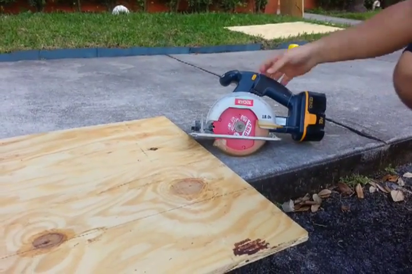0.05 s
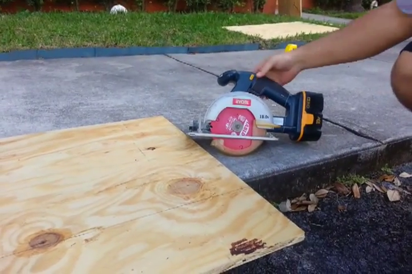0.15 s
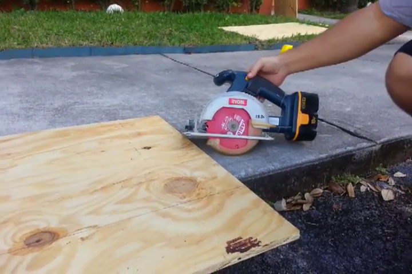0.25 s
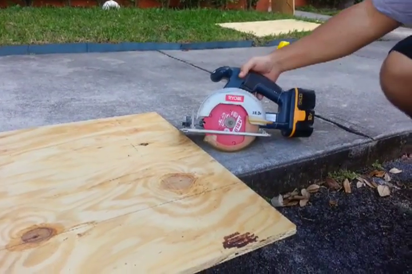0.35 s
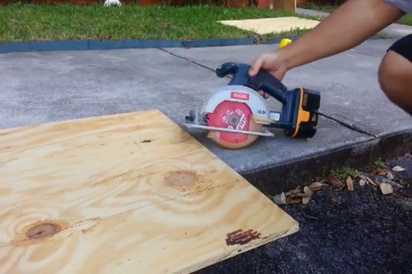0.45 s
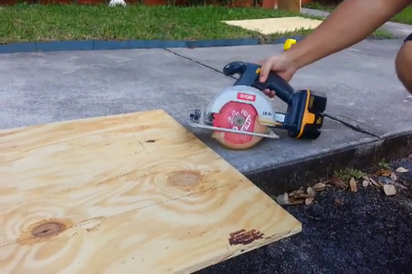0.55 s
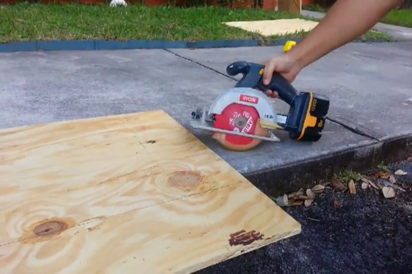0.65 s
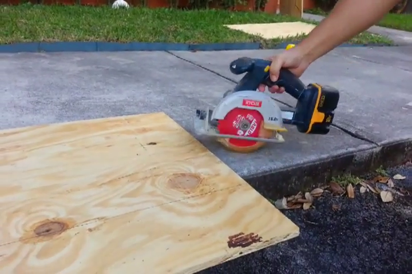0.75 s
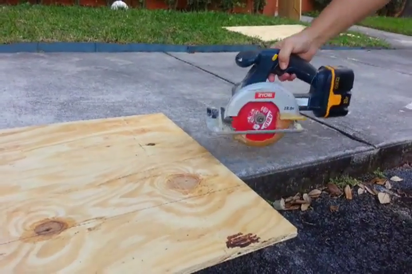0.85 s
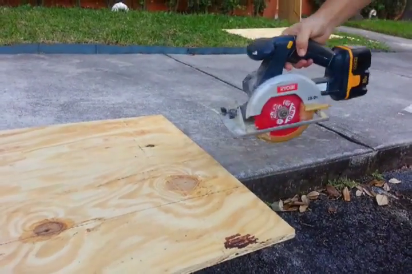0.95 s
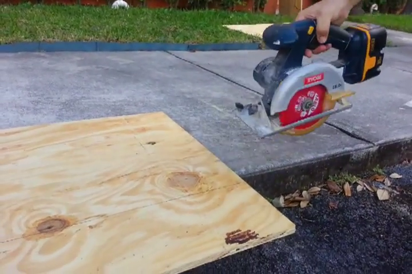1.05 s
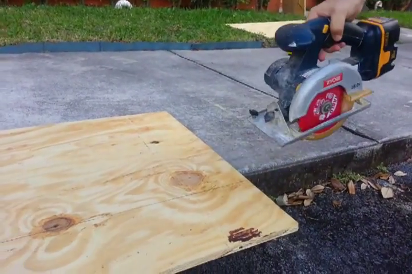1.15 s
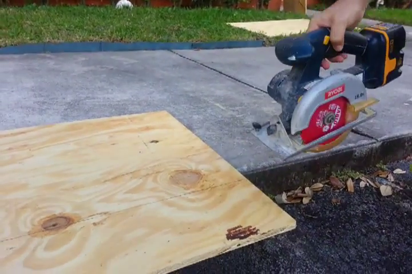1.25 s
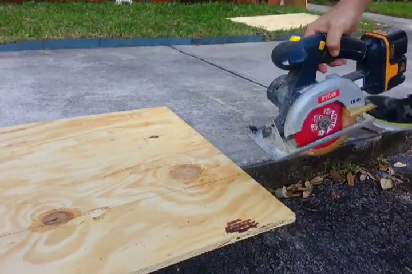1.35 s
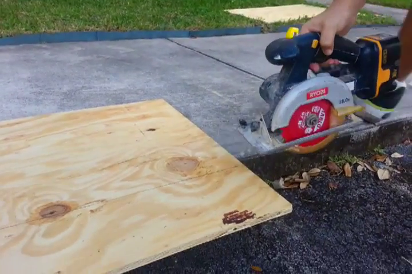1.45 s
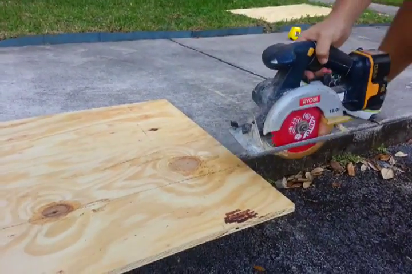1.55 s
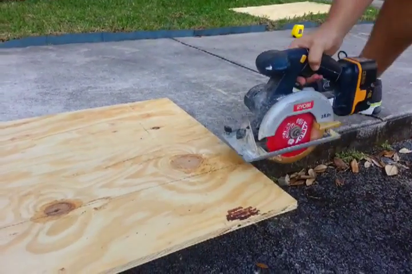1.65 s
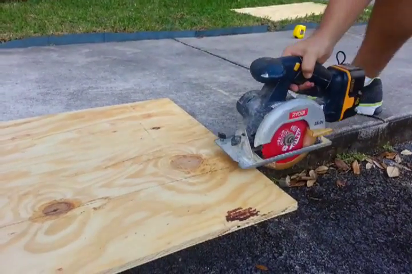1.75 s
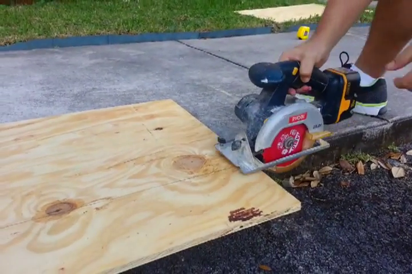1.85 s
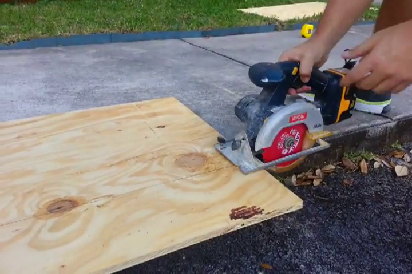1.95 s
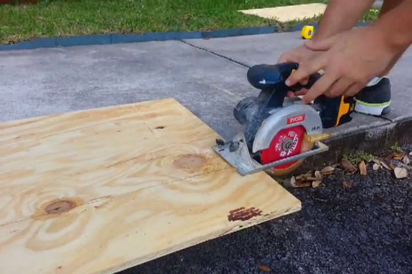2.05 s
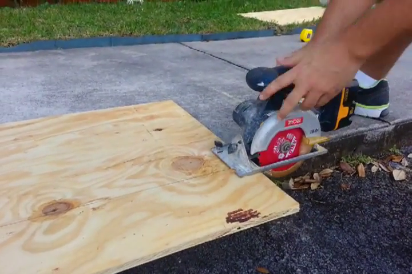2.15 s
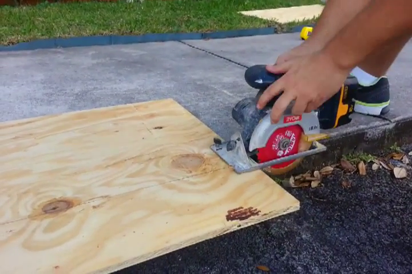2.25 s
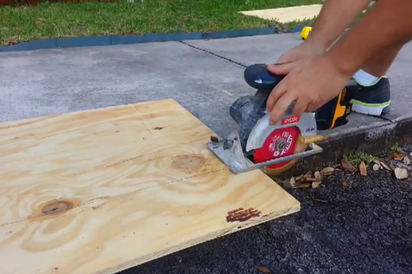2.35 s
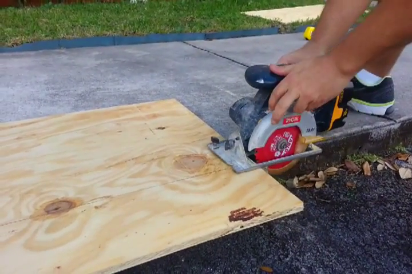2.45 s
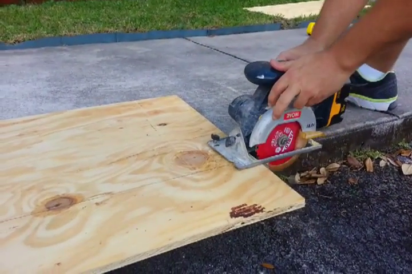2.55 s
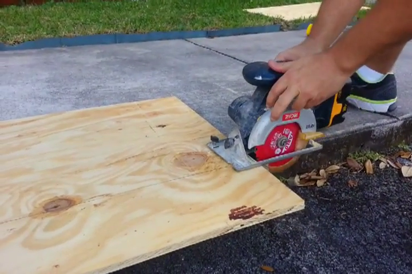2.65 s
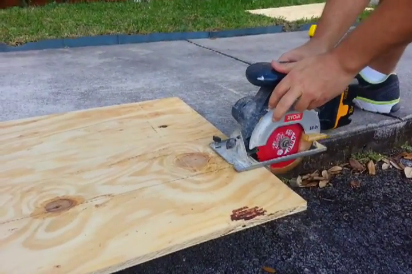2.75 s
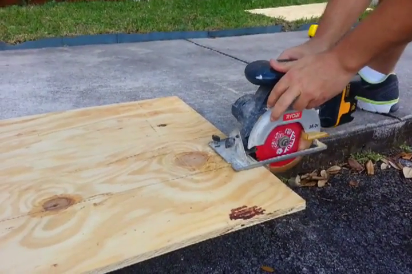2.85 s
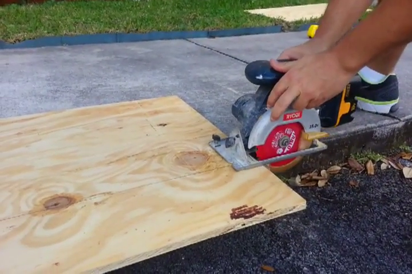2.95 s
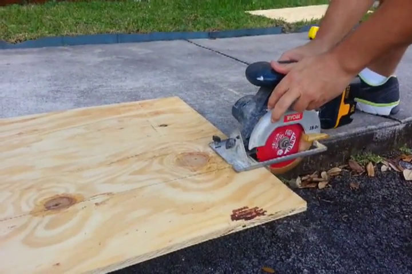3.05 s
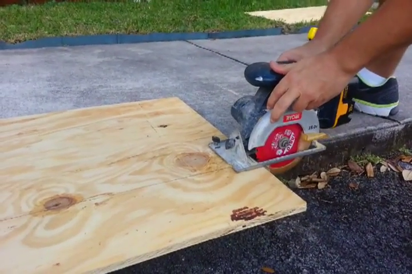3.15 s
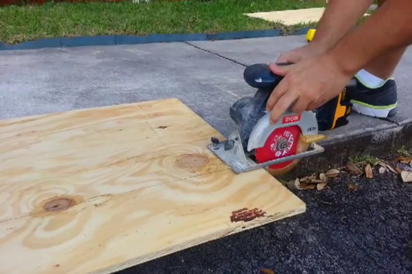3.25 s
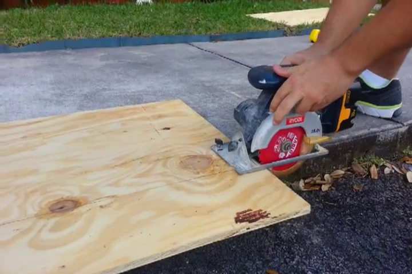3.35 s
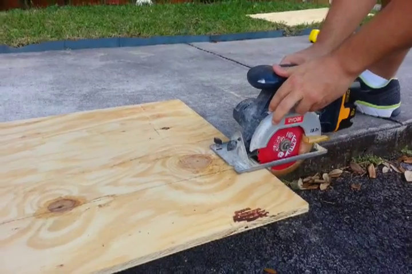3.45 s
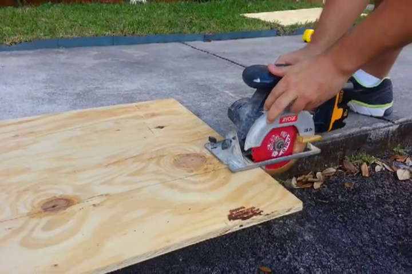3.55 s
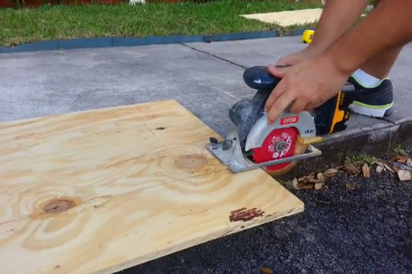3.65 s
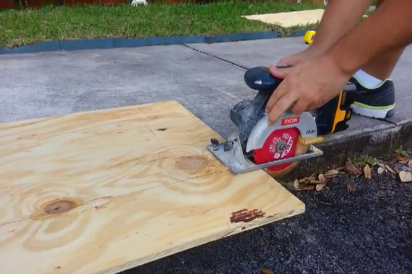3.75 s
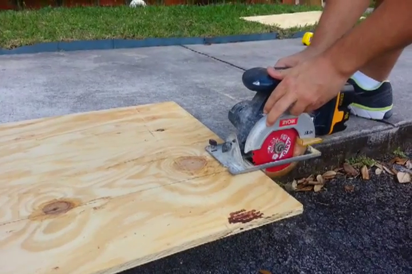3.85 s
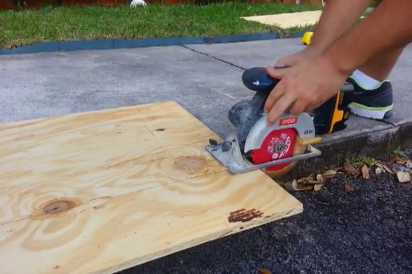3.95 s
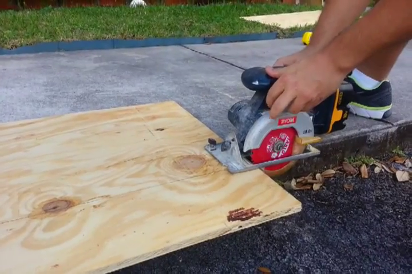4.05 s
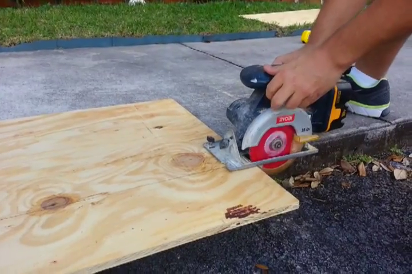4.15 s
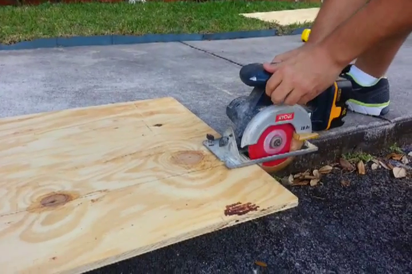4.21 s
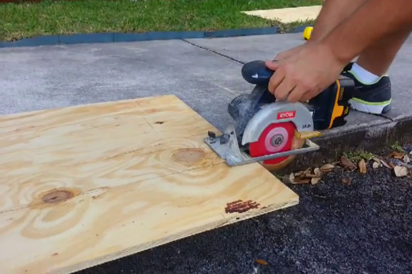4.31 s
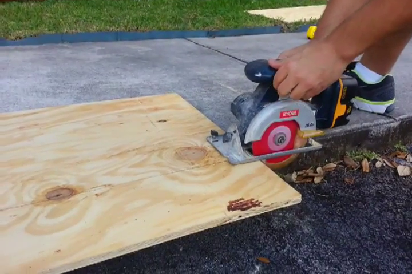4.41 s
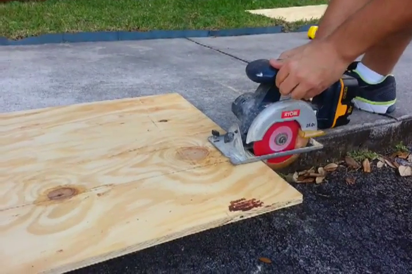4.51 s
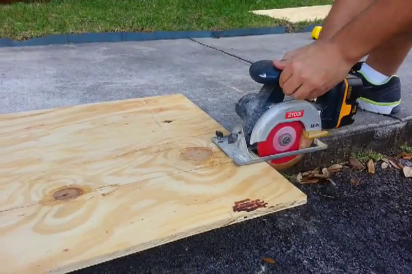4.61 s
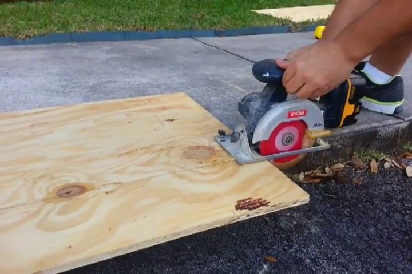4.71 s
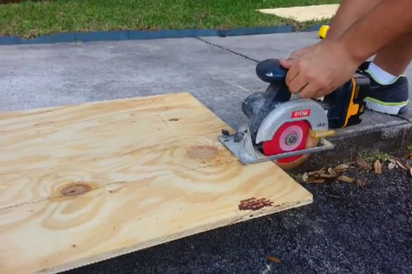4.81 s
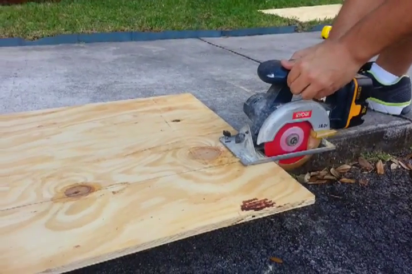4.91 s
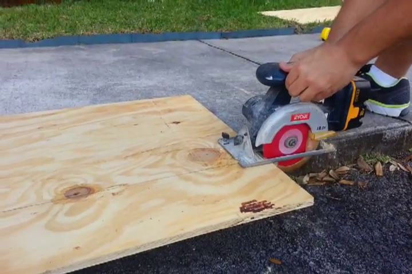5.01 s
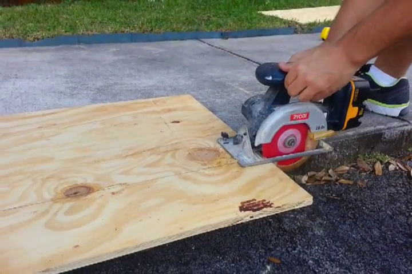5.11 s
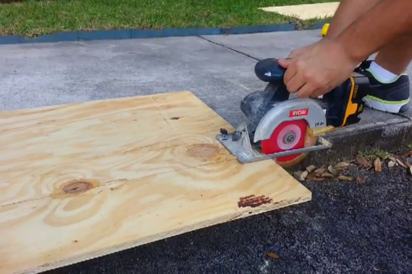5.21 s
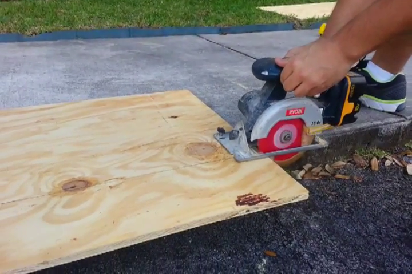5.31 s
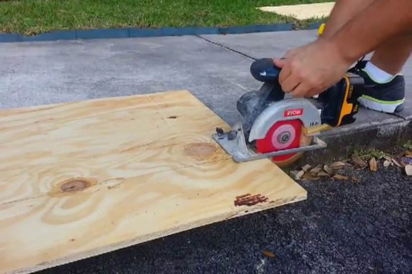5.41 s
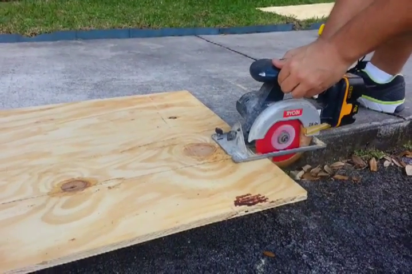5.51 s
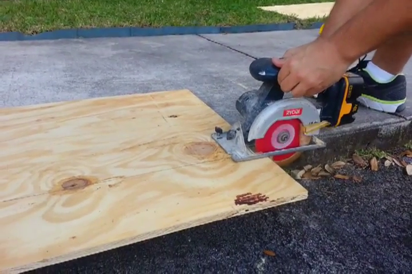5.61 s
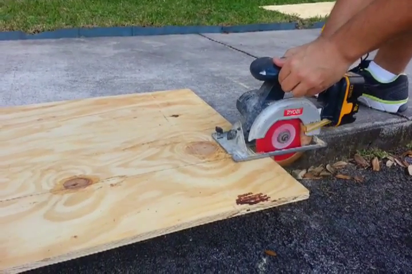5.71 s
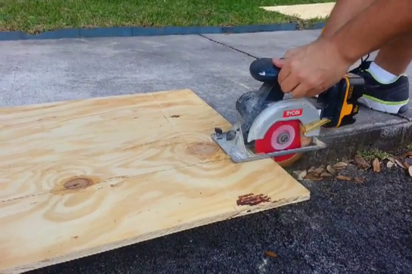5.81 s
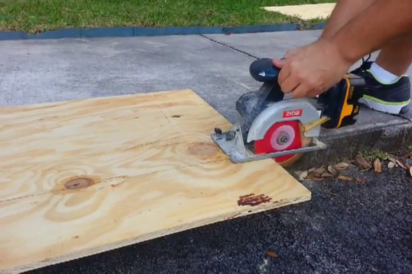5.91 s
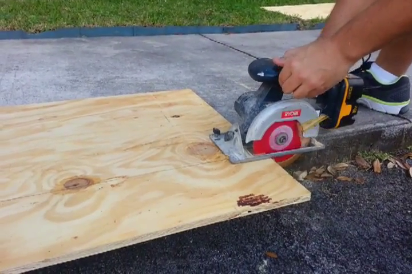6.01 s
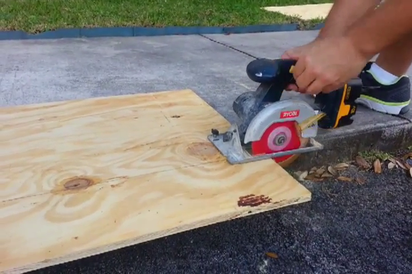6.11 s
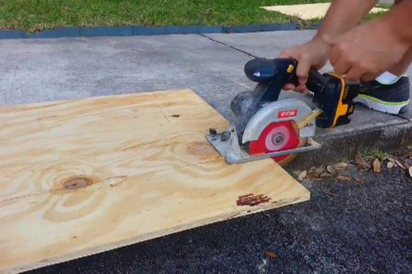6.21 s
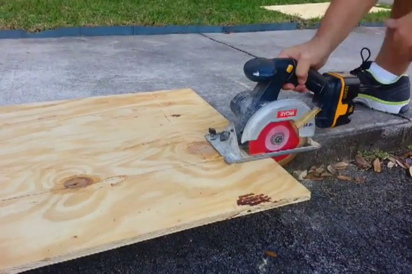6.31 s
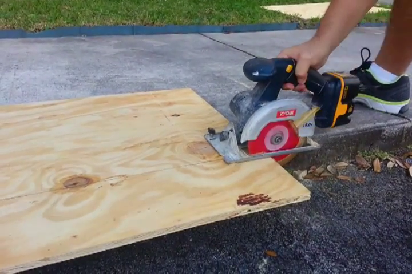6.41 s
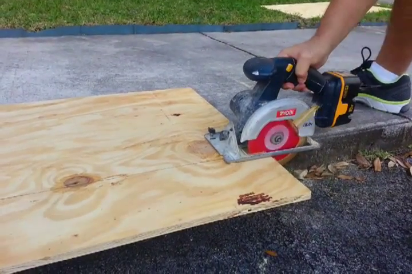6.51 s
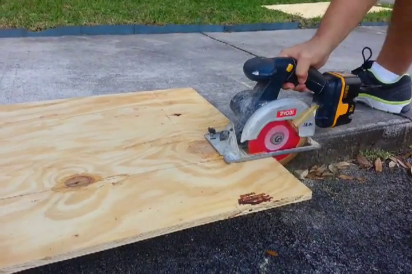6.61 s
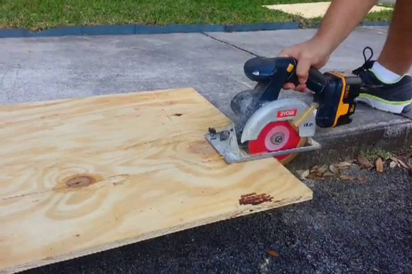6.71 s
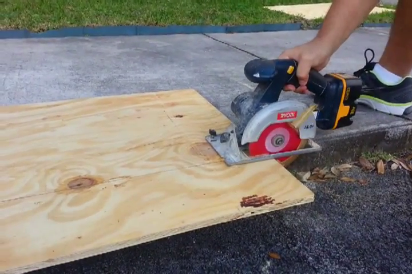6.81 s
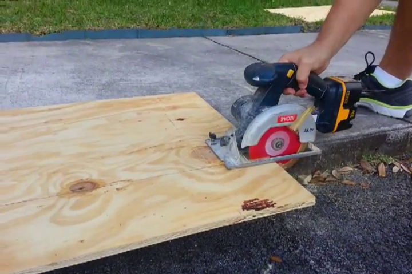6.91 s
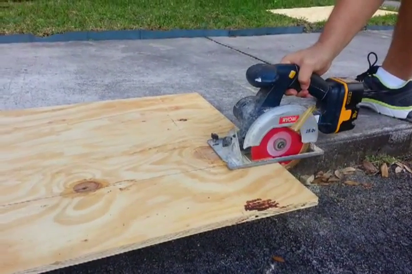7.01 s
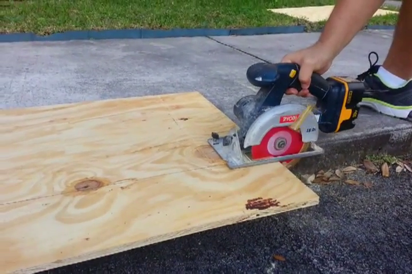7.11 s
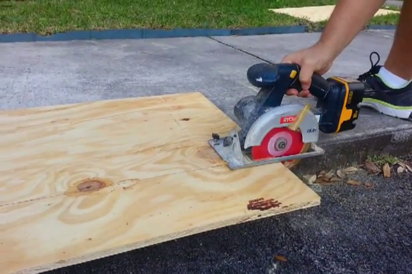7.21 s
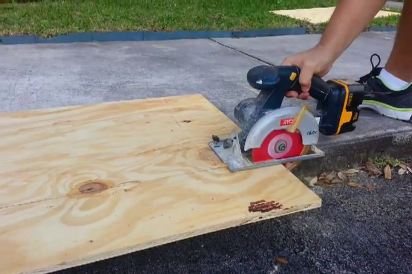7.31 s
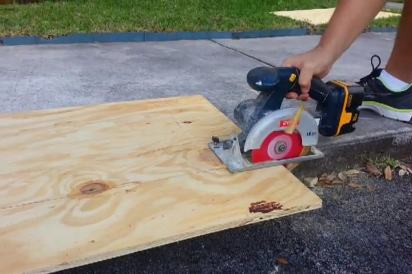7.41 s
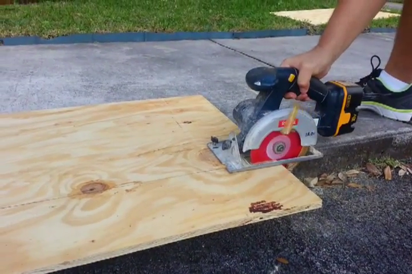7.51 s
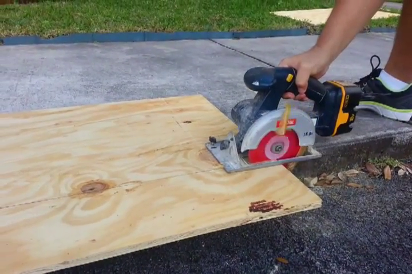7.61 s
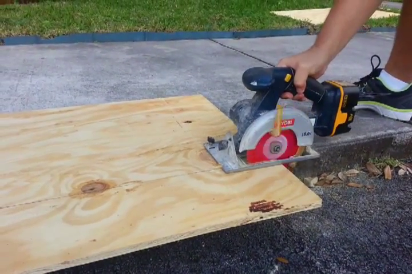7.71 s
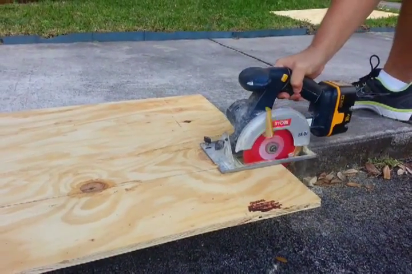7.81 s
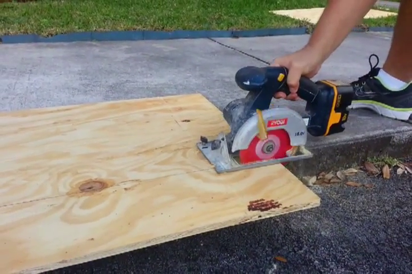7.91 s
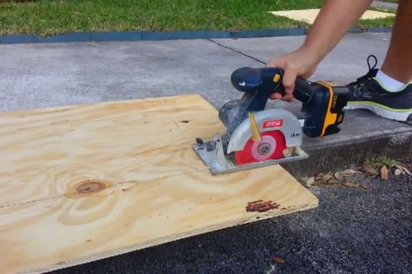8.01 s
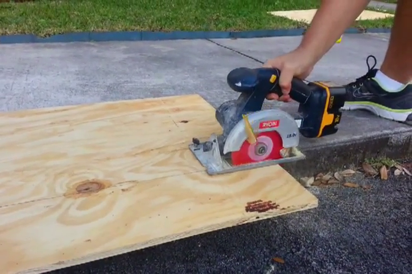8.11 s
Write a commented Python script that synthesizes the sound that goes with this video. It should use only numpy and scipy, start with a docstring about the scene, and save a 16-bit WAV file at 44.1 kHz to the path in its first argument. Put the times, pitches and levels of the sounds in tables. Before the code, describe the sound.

A saw is lifted and set down on plywood with clunks and scrapes, then suddenly starts and cuts in a loud, singing, abrasive whine.

```python
"""Clunks and scrapes, a rattling motor run-up, then a loud rasping whine, over a low outdoor hum.
A cordless circular saw is picked up from a concrete path, set on a plywood sheet and gripped.
Motor: noise bands with bursts, brush buzz and gear tones. Cut: noise bands that partly repeat each blade turn,
with snags and tooth harmonics that sing across blade modes as the speed varies.
Handling: decaying modes and shaped noise. Outdoors: low noise and wavering sines."""
import sys
import numpy as np
from scipy import signal
from scipy.fft import rfft, irfft, next_fast_len
from scipy.io import wavfile

SR = 44100
rng = np.random.default_rng(int(sys.argv[2]) if len(sys.argv) > 2 else 0)


def file_out(sig):
    """Save sig as 16-bit WAV at sys.argv[1]."""
    # one column per channel
    cols = np.atleast_2d(sig).T
    # limit, then scale
    lim = np.clip(cols, -1, 1)
    pcm = np.round(lim * 32767).astype(np.int16)
    wavfile.write(sys.argv[1], SR, pcm)


N = 359856
T, HZ = np.arange(N) / SR, np.maximum(np.fft.rfftfreq(next_fast_len(N, True), 1 / SR), 1)

# Drive: motor turns per blade turn, gear mesh cycles per blade turn.
TRIGGER_S, BITE_S = 4.188, 4.95
TEETH, MOTOR_PER_TURN, GEAR_TEETH = 18, 14 / 3, 56
# The run-up is fast at first, then creeps towards the free speed.
FREE_TURNS_PER_S, RUN_UP_S, RUN_UP_SHAPE = 77.7, .077, .77
# Blade speed in the wood as the push varies. Each row: time in seconds, turns per second.
CUT_SPEED = [(4.93, 77.4), (5.04, 73.65), (5.24, 74.9), (5.48, 72.9), (5.66, 70.95), (5.82, 69.95),
             (5.94, 68.45), (6.27, 67.6), (6.37, 68.15), (6.52, 70.5), (6.86, 70.63), (6.98, 69.55),
             (7.16, 71.05), (7.3, 69.8), (7.52, 69.64), (7.74, 67.18), (7.94, 62.7), (8.16, 60.9)]

# Cutting noise. Band edges in Hz: low rumble, drone, wood, rasp, hiss.
CUT_EDGES_HZ = [50, 220, 900, 3000, 8700, 16000]
# Cutting spectrum. Each row: frequency in Hz, relative density in dB per Hz.
CUT_COLOUR = [(60, -44.5), (120, -25), (183, -18.5), (340, -6), (450, -9.5), (600, -0.5), (788, -12),
              (1300, -3.5), (1700, 1.5), (2840, -9.5), (4780, -3), (5400, 5), (10000, -1), (14400, -9)]
# Resonances of sheet, shoe and blade. Each row: frequency in Hz, width in Hz, lift in dB.
BLADE = [(357, 20, 4.5), (920, 310, -5), (1065, 34, 9), (1400, 67, 6), (2180, 410, 4.5), (3620, 700, 4),
         (4370, 250, 4.5), (4840, 180, -1.5), (5630, 14, 8), (5710, 490, 5.5), (8210, 1130, 4.5),
         (9120, 250, 3.5), (9970, 370, 4)]
# Stereo balance of the cut. Each row: frequency in Hz, left minus right in dB.
CUT_SIDES = [(500, -0.5), (1400, 1.5), (2100, 9), (4000, -2), (4900, 1.5), (5600, 6), (6800, -5),
             (8300, -14.5), (10000, -8.5), (12500, 0.5)]
# Turn multiples favoured by uneven teeth. Each row: multiple of the turn, lift in dB.
UNEVEN = [(19, 1), (28, 4.5), (36, 7)]
# Level of the woody middle. Each row: time in seconds, level in dB.
WOOD = [(5.65, -27), (5.95, -25.5), (6.1, -23.5), (6.27, -26), (6.47, -19.5), (6.62, -23.5), (7.17, -19),
        (7.26, -23.5), (7.5, -24), (7.62, -27), (8.12, -23)]
# Level of the tooth rasp. Each row: time in seconds, level in dB.
RASP = [(5.2, -19.5), (5.42, -18), (5.75, -19.5), (6.05, -18), (6.25, -16), (6.48, -21.5), (6.65, -20.5),
        (7.17, -18.5), (7.27, -19.5), (7.45, -19.5), (7.6, -17.5), (8.14, -18)]
# Level of the treble hiss. Each row: time in seconds, level in dB.
HISS = [(5.2, -24), (5.5, -20.5), (5.72, -16), (6.0, -22.5), (6.28, -16), (6.45, -21.5), (6.6, -14),
        (6.92, -18.5), (7.17, -26.5), (7.27, -17), (7.45, -22.5), (7.63, -19), (7.83, -20.5), (8.0, -19),
        (8.15, -21)]
DRONE_DB, RUMBLE_DB = -38, -58  # an even drone, and a low rumble that swells and fades
GRAZE_S, ENTRY_S = 4.47, 0.48  # teeth first graze the edge; time from bite until the blade is buried
THROB_DB, ENTRY_THROB_DB = 1.9, 3.6  # once-a-turn rub in the kerf; extra at mid-entry
# Share of the throb in each cutting band, lowest band first, as a plain ratio.
THROB_SHARES = (.2, .35, .7, .75, 1.4)
# Power shares that repeat each blade or motor turn; the rest is chance.
BLADE_SHARE, MOTOR_SHARE, FREE_MOTOR_SHARE = .42, .1, .14
PATTERN_SHIFT_RAD, PATTERN_SHIFT_PER_S = 1.0, 2.5  # the repeating pattern changes as the contact shifts
RIPPLE_DB, RIPPLE_STEP_HZ = 1.7, 35  # many close modes

# Teeth snag in the edge. Each row: start in seconds, hold in seconds, level in dB.
SNAGS = [(4.927, 0.0026, -5.5), (4.927, 0.016, -17), (5.136, 0.0046, -14.5), (5.263, 0.021, -3.5),
         (5.324, 0.022, -8)]
SNAG_KICK_DB, SNAG_RING_S = 7, 0.0089  # a snag briefly makes the blade sing louder
# Singing multiples of the turn: six uneven ones, then those of the teeth.
SINGING_MULTIPLES = [8, 19, 23, 24, 29, 31, 18, 54, 72, 90, 108, 126, 144]
# Modes that make a multiple sing. Each row: frequency in Hz, width in Hz, level in dB,
# share of the binding's swing (ratio).
SINGING_MODES = [(553.8, 25, -37.5, -0.36), (1294, 136, -38, 0), (1675.5, 21.6, -25, 0.08),
                 (2155, 22, -24.5, 1.6), (3340, 220, -36, 1), (3700, 170, -31.5, 4), (4160, 91, -26, 1),
                 (4530, 280, -33, 0.5), (5570, 140, -24, 0.9), (5940, 170, -32, 2.8), (6197, 200, -20, 1.5),
                 (6752, 270, -17.5, 2), (7517, 180, -16, 4), (7200, 110, -25, 3), (7970, 250, -17.5, 1.5),
                 (8260, 190, -24, -0.5), (9855, 96, -23, -0.9)]
# How hard the blade binds in the kerf. Each row: time in seconds, binding in dB.
BINDING = [(4.95, 4.5), (5.08, -1), (5.19, -2.5), (5.4, 0.5), (5.9, -0.5), (6.15, -2), (6.5, -9), (7.2, -8),
           (7.72, 1), (7.85, 3), (7.96, -10.5), (8.13, 2)]
# Roughness of the whines, growing as the blade goes deeper. Each row: time in seconds, spread in whine cycles
# at the mean multiple.
SINGING_ROUGH = [(5.0, .05), (8.0, .075)]
SINGING_WAVER_DB, SINGING_GRIP_DB = 1.8, 1.0  # faster flutter; slower coming and going

# Free-running motor noise. Band edges in Hz: housing, gears, brushes and fan.
FREE_EDGES_HZ = [100, 900, 3000, 16000]
# Free-running spectrum. Each row: frequency in Hz, relative density in dB per Hz.
FREE_COLOUR = [(71, -6), (120, -12), (273, -7), (347, -11.5), (391, -10.5), (685, -14), (907, -17),
               (1720, 0), (2020, -9), (2470, -7), (2960, -13.5), (3990, -6), (4880, -12), (8540, -3.5),
               (14400, -18)]
# Resonances of housing and gearbox. Each row: frequency in Hz, width in Hz, lift in dB.
HOUSING = [(345, 23, 14.5), (584, 320, 13.5), (1730, 230, 3.5), (2330, 200, 1.5), (8500, 630, 5)]
# Stereo balance of the free motor. Each row: frequency in Hz, left minus right in dB.
FREE_SIDES = [(300, -1.5), (2200, 5), (5500, 3.5), (8500, -13), (14000, -1)]
# Level of the rattle. Each row: time in seconds, level in dB.
RATTLE = [(4.2, -22), (4.216, -19.5), (4.234, -18.5), (4.434, -17), (4.446, -26), (4.46, -19.5),
          (4.54, -20), (4.91, -19.5), (4.92, -20.5)]
# Rows for housing, gears, brushes and fan: dB against the rattle, dB gained from rest to free speed.
FREE_PARTS = [(-11, 27), (-1.5, 6), (0, 1)]
FREE_THROB_DB = 2.2  # the free blade's hiss pulses once a turn
# Modes swept by motor unbalance and gear mesh. Each row: frequency in Hz, width in Hz, level in dB.
MOTOR_MODES = [(355.6, 4.7, -24), (4092, 70, -22.5), (4310, 44, -26.5)]
GEAR_PLAY_TURNS = .0012  # backlash roughens the tones
# Gear chirp during run-up. Each row: multiple of the motor turn, level in dB.
CHIRP = [(8, -14), (11, -28), (14, -25)]
CHIRP_S, CHIRP_HALF_S, CHIRP_WANDER_CYCLES = 4.243, .022, .04

# Saw knocks on the sheet. Each row: time in seconds, level in dB, favoured frequency in Hz.
KNOCKS = [(.384, -24, 367), (0.543, -29, 330), (1.957, -11, 443), (1.969, -14.5, 333), (2.144, -19, 527),
          (2.178, -22.5, 353), (2.279, -22.5, 544), (2.347, -17.5, 400), (2.679, -23.5, 310),
          (4.188, -14.5, 295), (4.996, -24, 260)]
# Ringing modes of the sheet. Each row: frequency in Hz, level in dB, 60 dB decay in seconds.
SHEET = [(243, -17.5, 0.32), (260, -7, 0.11), (314, -8.5, .11), (355.3, -11.5, 0.25), (393, -19, 0.24),
         (448.4, -10, 0.2), (572, -3, 0.024), (710, -11.5, 0.043), (818, -12, 0.077), (1130, -15, 0.046),
         (1450, -8, 0.052), (1880, -25, .05)]
OFF_PITCH_DB_PER_OCTAVE = 7  # modes far from a knock's favoured pitch ring less
# Shoe chatters on the sheet. Each row: time in seconds, level in dB.
CHATTER = [(1.985, -16), (2.006, -24), (2.026, -30), (2.059, -29), (2.08, -33), (2.298, -21.5),
           (2.377, -17.5), (2.403, -24)]
# Ringing modes of the shoe. Each row: frequency in Hz, level in dB, 60 dB decay in seconds.
SHOE = [(1086, -8.5, 0.033), (1240, -6.5, 0.02), (1440, -3, 0.0084), (1900, -33, 0.011)]
# Plastic body clacks as it is lifted and gripped. Each row: time in seconds, level in dB.
CLACKS = [(.543, -33), (.569, -22), (.790, -15.5), (.794, -44), (2.668, -46), (2.727, -29)]
# Ringing modes of the body. Each row: frequency in Hz, level in dB, 60 dB decay in seconds.
BODY = [(1180, -10.5, 0.018), (1510, -14, 0.013), (1840, -8, 0.044), (1960, -19, 0.069), (3220, -39, .04)]
# Dry ticks of the metal guard, and the loud crack as the motor starts.
# Each row: time in seconds, level in dB.
TICKS = [(1.171, -36), (1.850, -26.5), (2.242, -42), (2.286, -48), (2.405, -38), (2.489, -30),
         (4.201, -2.5)]
# Ringing modes of ticks and crack. Each row: frequency in Hz, level in dB, 60 dB decay in seconds.
TICK_MODES = [(2600, -6.5, 0.0093), (3520, -12, 0.0093), (5200, -8.5, 0.0062), (5970, -11, 0.0087),
              (7350, -7, 0.0072)]
# Clicks of handle, trigger and gears. Each row: time in seconds, relative clunk and tick levels in dB.
CLICKS = [(0.173, -46, -45), (0.352, -48, -37.5), (0.382, -52, -35.5), (0.542, -29.5, -27),
          (0.789, -36, -43), (0.863, -52, -44), (1.01, -45.5, -51), (1.076, -65, -37.5), (1.25, -47, -48),
          (1.527, -37, -58), (1.959, -38, -43), (2.352, -40, -38), (2.366, -43, -39), (2.666, -33.5, -28.5),
          (2.781, -32, -32.5), (3.448, -55, -63), (3.902, -36, -37), (4.023, -41.5, -50), (4.14, -40, -54),
          (4.2012, -28, -23), (4.548, -26, -36), (4.77, -31, -35)]
# Clunk spectrum. Each row: frequency in Hz, relative density in dB per Hz.
CLUNK_COLOUR = [(200, 2), (700, -4), (1200, -2), (1900, -4), (2700, -9), (5000, -66)]
# Tick spectrum. Each row: frequency in Hz, relative density in dB per Hz.
TICK_COLOUR = [(1400, 3.5), (2800, -2), (5400, 2), (8200, 2), (10400, -8.5), (14400, -16)]
# Hands and shoe rub and scrape. Each row: middle in seconds, half length in seconds, level in dB,
# resonance in Hz, width in Hz, lift in dB.
SCRAPES = [(0.179, 0.21, -54.5, 4700, 1400, 17), (0.568, 0.027, -37, 1700, 900, 15),
           (0.773, 0.021, -38, 1170, 700, 16), (0.75, 0.52, -58, 7950, 1400, 8),
           (1.21, 0.066, -52.5, 7800, 1400, 9), (1.392, 0.07, -49, 7900, 1400, 15),
           (1.543, 0.026, -41.5, 1460, 1400, 21), (2.19, 0.75, -56, 8100, 1400, 1.5),
           (2.157, 0.024, -52, 1700, 900, 32), (2.333, 0.082, -46, 2000, 900, 10),
           (2.335, 0.045, -48, 5400, 400, 12), (3.89, 0.014, -48, 1900, 1400, 10)]

# Outdoor air spectrum. Each row: frequency in Hz, relative density in dB per Hz.
AIR = [(25, -60), (42, -12), (104, -6.5), (286, -11.5), (392, -16), (824, -25), (1100, -29), (3260, -40.5),
       (14000, -47.5)]
AIR_DB = -43.5
# Distant machinery. Each row: frequency in Hz, level in dB.
HUM = [(57, -51), (91, -53.5), (114, -48), (362, -58)]

# Likeness of the two channels. Each row: frequency in Hz, left-right coherence (0 to 1).
LIKENESS = [(60, 1), (130, 1), (280, 0.84), (620, 0.67), (1350, 0.21), (2940, 0.14), (6400, 0.42),
            (13900, 0.0024)]
# Phase between the channels. Each row: frequency in Hz, lead of the left in radians.
LEFT_LEAD = [(0, 0), (1810, 0.58), (2240, -0.27), (3700, -0.23), (4390, 3.5), (5340, 0.8), (6720, 1.26),
             (8100, -3.5), (9730, -3.5), (14100, -1.5)]
STOP_HZ = 15100


def blade_speed():
    """Turns per second: the motor runs up from the trigger until the wood holds it back."""
    age_s = np.maximum(T - TRIGGER_S, 0)
    free = FREE_TURNS_PER_S * (1 - np.exp(-(age_s / RUN_UP_S) ** RUN_UP_SHAPE))
    return np.minimum(free, in_time(CUT_SPEED)[0])


def cutting(speed, turns):
    """Teeth tear the wood, partly alike on each turn and partly at random, and set the blade singing."""
    chips = white() * (1 + 0.072 * np.cos(2 * np.pi * TEETH * turns))  # each tooth throws its own burst
    tearing = np.sqrt(BLADE_SHARE) * turn_pattern(turns, UNEVEN, count=220)
    tearing = tearing + np.sqrt(MOTOR_SHARE) * brushes(turns)
    tearing = tearing + np.sqrt(1 - BLADE_SHARE - MOTOR_SHARE) * chips / chips.std()
    shape_db = resonant(CUT_COLOUR, BLADE) + ripple()
    bands = in_bands(tearing, shape_db, CUT_SIDES, CUT_EDGES_HZ)

    swing_db = THROB_DB + ENTRY_THROB_DB * np.sin(np.pi * ramp(BITE_S, ENTRY_S))
    # the square term holds the mean power roughly constant
    rub_db = swing_db * np.cos(2 * np.pi * turns + 0.55 * drift(9)) - 0.07 * swing_db ** 2

    grazing, biting = ramp(GRAZE_S, BITE_S - GRAZE_S), ramp(BITE_S, 0.046)
    rumble = biting * from_db(RUMBLE_DB + 13 * np.minimum(drift(3), 1.2))
    drone = biting * from_db(DRONE_DB + 2 * drift(17))
    wood = biting * from_db(in_time(WOOD)[0])
    rasp = np.sqrt(grazing) * from_db(in_time(RASP)[0])
    hiss = biting * from_db(in_time(HISS)[0])
    noise = sum(band * level * from_db(share * rub_db + 2.04 * drift(14))
                for band, level, share in zip(bands, (rumble, drone, wood, rasp, hiss), THROB_SHARES))
    snags = snagging(release_s=0.0086) * radiate(white(), shape_db) * from_db(5.9 * drift(310))
    return noise + singing(speed, turns, in_time(BINDING)[0], rub_db) + snags


def singing(speed, turns, binding_db, rub_db):
    """Turn multiples swell as the speed carries them across blade modes, driven by binding and snags."""
    slow = slice(None, None, 40)
    kick = 1 + from_db(SNAG_KICK_DB) * snagging(SNAG_RING_S)[slow]
    drives = [from_db(db + share * binding_db[slow]) * kick ** share for _, _, db, share in SINGING_MODES]
    whine, rough = 0, in_time(SINGING_ROUGH)[0]
    for multiple in SINGING_MULTIPLES:
        pitch_hz = multiple * speed
        strength = sum(drive * response(pitch_hz[slow], hz, width)
                       for drive, (hz, width, _, _) in zip(drives, SINGING_MODES))
        side_db = np.interp(pitch_hz, *np.transpose(CUT_SIDES))  # each pitch beams its own way
        level_db = rub_db + SINGING_WAVER_DB * drift(25) + SINGING_GRIP_DB * drift(10.5)
        jitter_cycles = rough * multiple / np.mean(SINGING_MULTIPLES) * drift(150)
        sine = tone(multiple * turns + jitter_cycles, level_db, side_db)
        whine = whine + np.interp(T, T[slow], strength) * sine
    return whine * ramp(SNAGS[0][0], 0.0033)


def snagging(release_s):
    """Envelope of the snags: each jumps up, holds and dies away."""
    return sum(from_db(db) * ramp(s, 0.0018) * np.exp(-np.clip((T - s - length) / release_s, 0, 40))
               for s, length, db in SNAGS)


def motor(speed, turns):
    """Backlash rattles the housing in uneven bursts; gears chirp and whistle as they sweep its resonances."""
    whirr = np.sqrt(FREE_MOTOR_SHARE) * brushes(turns) + np.sqrt(1 - FREE_MOTOR_SHARE) * white()
    bands = in_bands(whirr, resonant(FREE_COLOUR, HOUSING) + ripple(), FREE_SIDES, FREE_EDGES_HZ)
    bands[-1] = bands[-1] * from_db(FREE_THROB_DB * np.cos(2 * np.pi * turns))

    burst_hz = 55 * (1 + 0.233 * drift(21.6))
    burst = np.cos(2 * np.pi * np.cumsum(burst_hz) / SR) + 0.7 * drift(26)
    level_db, shortfall = in_time(RATTLE)[0], 1 - speed / FREE_TURNS_PER_S
    noise = 0
    for band, (db, gained_db), share in zip(bands, FREE_PARTS, (.3, 1.0, .8)):
        rattle_db = 2.5 * (share * burst + 0.54 * drift(90))
        noise = noise + band * from_db(level_db + db - gained_db * shortfall + rattle_db)

    chirp = sum(tone(multiple * MOTOR_PER_TURN * turns + CHIRP_WANDER_CYCLES * drift(150), db + drift(80))
                for multiple, db in CHIRP)
    tones = 0
    for multiple in (MOTOR_PER_TURN, GEAR_TEETH):  # unbalance, mesh
        strength = sum(from_db(db) * response(multiple * speed, hz, width) for hz, width, db in MOTOR_MODES)
        tones = tones + strength * tone(multiple * (turns + GEAR_PLAY_TURNS * drift(82)), 2.5 * drift(13))
    running = ramp(TRIGGER_S, 0.0008) * (1 - ramp(BITE_S, 0.027))
    return (noise + swell(CHIRP_S, CHIRP_HALF_S) * chirp + tones) * running


def brushes(turns):
    """The buzz of the brushes, repeating with each turn of the motor."""
    return turn_pattern(MOTOR_PER_TURN * turns, [], count=44)


def turn_pattern(turns, favoured, count, size=8192):
    """Unequal teeth or motor segments make a rough pattern that recurs each turn, slowly changing."""
    lift_db = rng.normal(0, 1.2, (2, 2, count))
    for multiple, db in favoured:
        lift_db[..., round(multiple)] = db
    one_turn = irfft(from_db(lift_db) * np.exp(2j * np.pi * rng.random((2, 2, count))), size)
    first, second = one_turn[..., (turns % 1 * size).astype(int)] / one_turn.std()
    shift = PATTERN_SHIFT_RAD * drift(PATTERN_SHIFT_PER_S)
    return np.cos(shift) * first + np.sin(shift) * second


def handling():
    """Plastic clunks and ticks with a little scuffing; ringing blows and a start crack; rubbing and scraping."""
    s, low_db, high_db = np.transpose(CLICKS)
    clunk_shape_db = resonant(CLUNK_COLOUR, [(1920, 160, 5), (2400, 160, 8), (1230, 150, 3)])
    clunks = dying(s, low_db + 2.5, .06) * radiate(white(), clunk_shape_db)
    scuff = sum(from_db(db - 16) * swell(middle, 0.0091) for middle, db in zip(s, high_db))
    ticks = (dying(s, high_db + 2.5, .04) + scuff) * radiate(white(), over_hz(TICK_COLOUR))

    knock_s, knock_db, _ = np.transpose(KNOCKS)
    cracks = from_db(-13) * dying(knock_s, knock_db, 0.01) * radiate(white(), over_hz(CLUNK_COLOUR))
    ringing = struck(KNOCKS, SHEET) + struck(CHATTER, SHOE) + struck(CLACKS, BODY) + struck(TICKS, TICK_MODES)

    friction = white() * from_db(3 * drift(90))
    scrapes = 0
    for middle, half, db, hz, width, lift_db in SCRAPES:
        rub = radiate(friction, resonant(TICK_COLOUR, [(hz, width, lift_db)]))
        scrapes = scrapes + from_db(db) * swell(middle, half) * rub
    return clunks + ticks + scrapes + ringing + cracks


def struck(blows, modes):
    """Each blow rings every mode with its own strength; where it lands may favour modes near one pitch."""
    times, blow_db, *favoured = np.transpose(blows)
    shared_db = rng.normal(0, 2.4, (len(times), len(modes), 1))
    chance_db = shared_db + rng.normal(0, 1, (len(times), len(modes), 2))  # per channel
    out = np.zeros((2, N))
    for k, (hz, db, t60) in enumerate(modes):
        away_db = OFF_PITCH_DB_PER_OCTAVE * abs(np.log2(hz / favoured[0])) if favoured else 0
        clicks = np.full((2, N), 1e-18)
        clicks[:, (times * SR).astype(int)] = (-1) ** k * from_db(blow_db + db - away_db + chance_db[:, k].T)
        r, w = from_db(-60 / (t60 * SR)), 2 * np.pi * hz / SR
        out += signal.lfilter([0, np.sin(w)], [1, -2 * r * np.cos(w), r * r], clicks)
    return out


def dying(times, levels_db, t60, rise_s=0.00077, tail_db=-17, tail_t60=0.27):
    """Envelope of short hits: contact builds up, dies quickly and leaves a faint outdoor tail."""
    power, age = np.zeros(N), T[:SR // 2]
    fall = from_db(-60 * age / t60) + from_db(tail_db - 60 * age / tail_t60)
    shape = fall * np.minimum(age / rise_s, 1)
    for s, db in zip(times, levels_db):
        power[int(s * SR):int(s * SR) + len(age)] += (from_db(db) * shape) ** 2
    return np.sqrt(power)


def outdoors():
    """Low air noise and the wavering hum of distant machinery."""
    hum = sum(tone(hz * T + 0.085 * drift(3.7), db + drift(3.8), -1.6) for hz, db in HUM)
    return from_db(AIR_DB) * radiate(white(), over_hz(AIR), 0.79) + hum


def from_db(db):
    """Decibels to gain."""
    return 10 ** (np.asarray(db) / 20)


def in_time(rows):
    """Each column of a curve at every sample."""
    s, *columns = np.transpose(rows)
    return [np.interp(T, s, c) for c in columns]


def over_hz(points):
    """A spectrum table at every frequency, straight over log frequency."""
    hz, value = np.transpose(points)
    return np.interp(np.log(HZ), np.log(hz), value)


def drift(rate):
    """Smooth chance with spread 1 that changes about rate times a second."""
    r = np.exp(-80 * np.pi * rate / SR)  # filtered at 1/40 of the sample rate
    slow = signal.lfilter([1], [1, -2 * r, r * r], rng.standard_normal(N // 40 + 2002))[2000:]
    return np.interp(np.arange(N) / 40, np.arange(len(slow)), slow / slow.std())


def white():
    """Two unrelated noises."""
    return rng.standard_normal((2, N))


def ramp(start, length):
    """0 before start, 1 once length has passed."""
    return np.clip((T - start) / length, 0, 1)


def swell(middle, half_length):
    """A bell-shaped rise and fall."""
    return np.exp(-np.minimum(((T - middle) / half_length) ** 2, 40))


def response(hz, mode_hz, width):
    """How strongly a mode answers at a frequency: 1 at its centre."""
    return 1 / (1 + (2 * (hz - mode_hz) / width) ** 2)


def resonant(colour, peaks):
    """A smooth spectrum with resonances on it, in dB."""
    return over_hz(colour) + sum(db * response(HZ, hz, width) for hz, width, db in peaks)


def ripple():
    """Chance peaks and dips of many close modes, in dB, growing up to 3 kHz."""
    grid = np.arange(0, SR / 2, RIPPLE_STEP_HZ)
    return np.interp(HZ, grid, RIPPLE_DB * rng.standard_normal(len(grid)) * np.minimum(grid / 3000, 1))


def panned(side_db):
    """Left and right gains of constant power."""
    gains = from_db(np.array([[.5], [-.5]]) * side_db)
    return gains / np.sqrt(np.mean(gains ** 2, axis=0))


def tone(cycles, level_db, side_db=0):
    """A sine whose left channel leads the right by an eighth of a cycle."""
    sine = np.sin(2 * np.pi * cycles + [[np.pi / 4], [0]])
    return np.sqrt(2) * from_db(level_db) * sine * panned(side_db)


def radiate(pair, shape_db, side_db=0):
    """Two flat signals become a coloured stereo sound of rms about 1."""
    gain, alike = from_db(shape_db), np.clip(over_hz(LIKENESS), -.99, .99)
    size = next_fast_len(N, True)
    mid, side = rfft(pair, size)
    both = np.sqrt((1 + alike) / 2) * mid + np.sqrt((1 - alike) / 2) * side * [[1], [-1]]
    both[1] *= np.exp(-1j * over_hz(LEFT_LEAD))
    return irfft(both * gain / np.sqrt(np.mean(gain ** 2)) * panned(side_db), size)[:, :N]


def in_bands(pair, shape_db, sides, edges_hz):
    """The same sound split into neighbouring bands, each of rms about 1."""
    skirts_db = [-10 * np.log10((1 + (low / HZ) ** 12) * (1 + (HZ / high) ** 12))
                 for low, high in zip(edges_hz, edges_hz[1:])]
    return [radiate(pair, shape_db + skirt_db, over_hz(sides)) for skirt_db in skirts_db]


def scene():
    """Everything on the saw turns with the blade; the background sinks away while the saw is loud."""
    speed = blade_speed()
    turns = np.cumsum(speed * (1 + 0.001025 * drift(15.07))) / SR
    saw = motor(speed, turns) + cutting(speed, turns)
    keep = np.exp(-1 / (.05 * SR))  # 50 ms smoothing
    loudness = np.sqrt(signal.lfilter([1 - keep], [1, -keep], np.mean(saw ** 2, axis=0)))
    duck = 1 + (loudness / from_db(-31)) ** 2  # background halved at -31 dB
    return saw + handling() + outdoors() / duck


def record(dry):
    """The loudest peaks are rounded off, and the top is cut."""
    rounded = dry / (1 + (dry / .8) ** 6) ** (1 / 6)
    return signal.sosfilt(signal.cheby2(20, 70, STOP_HZ, fs=SR, output="sos"), rounded)


dry = scene()
out = record(dry)
file_out(out)
```